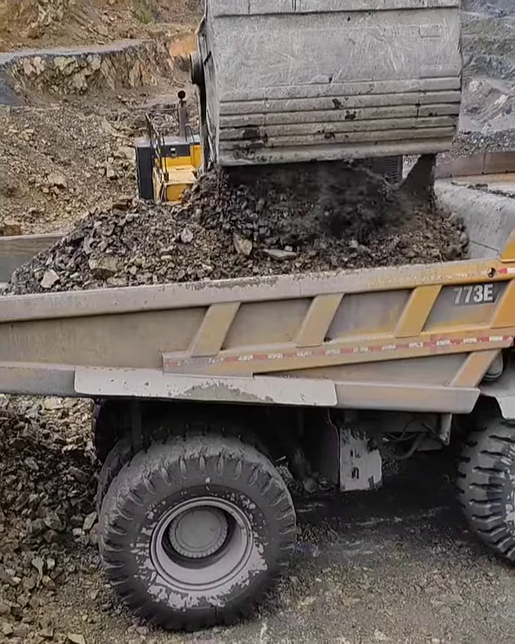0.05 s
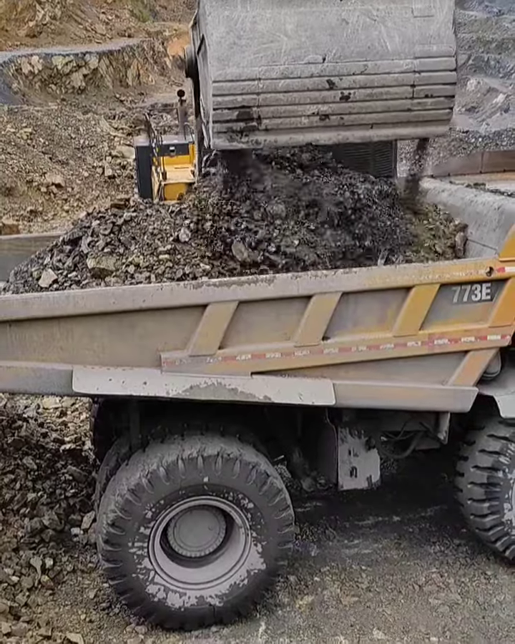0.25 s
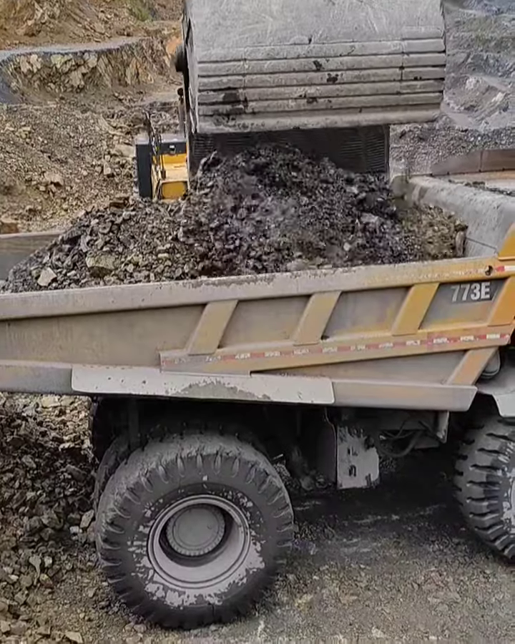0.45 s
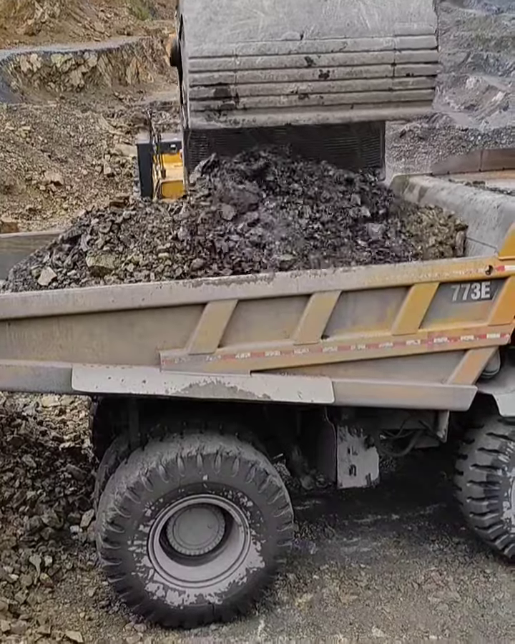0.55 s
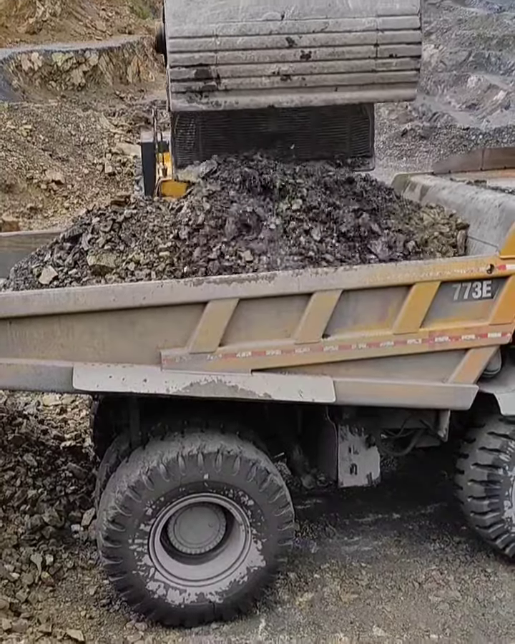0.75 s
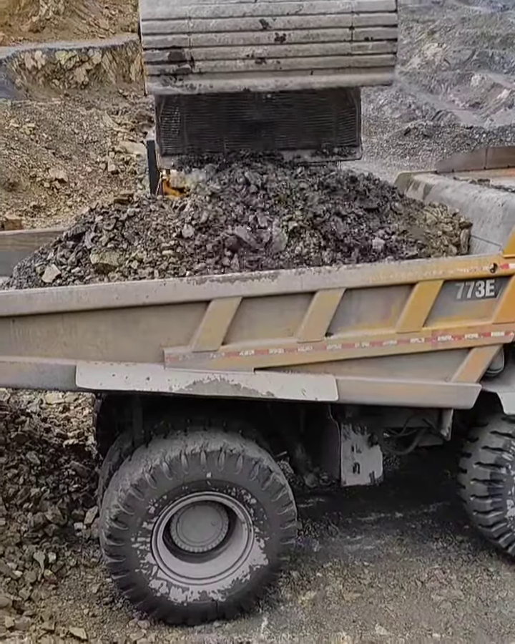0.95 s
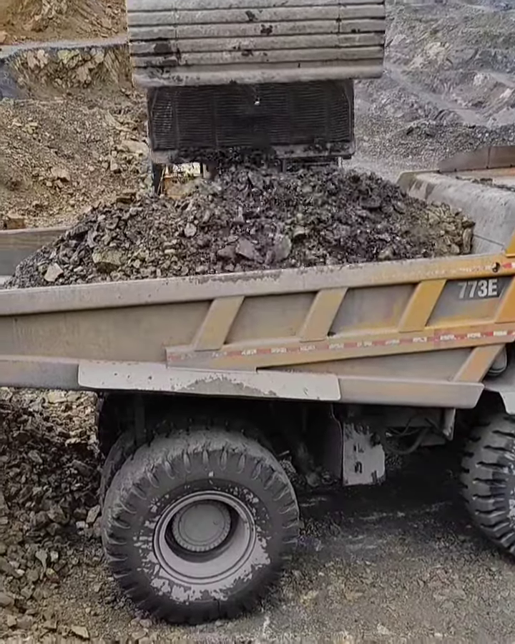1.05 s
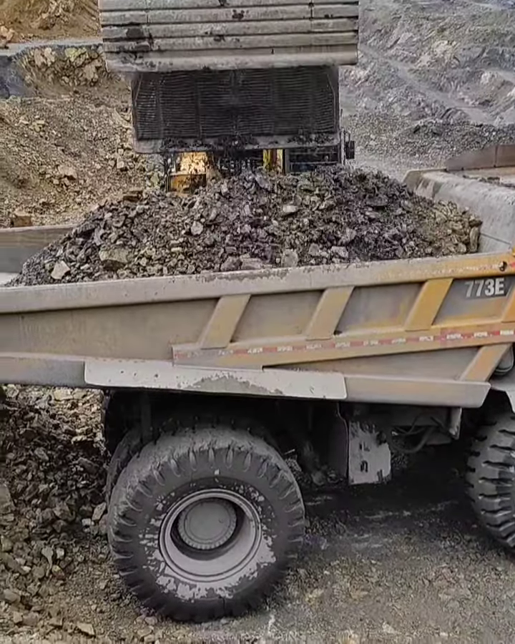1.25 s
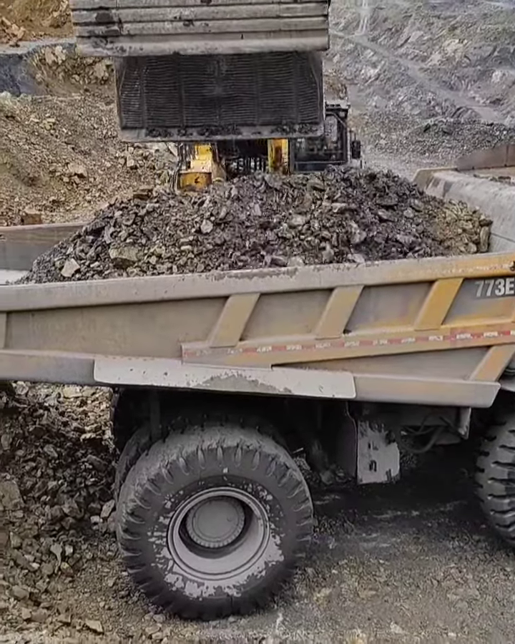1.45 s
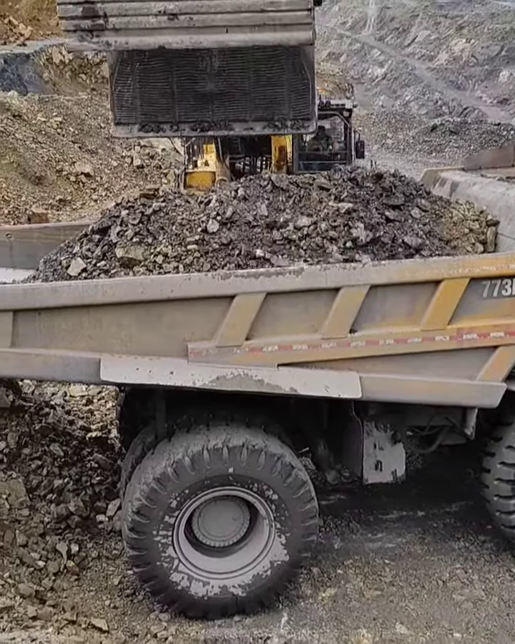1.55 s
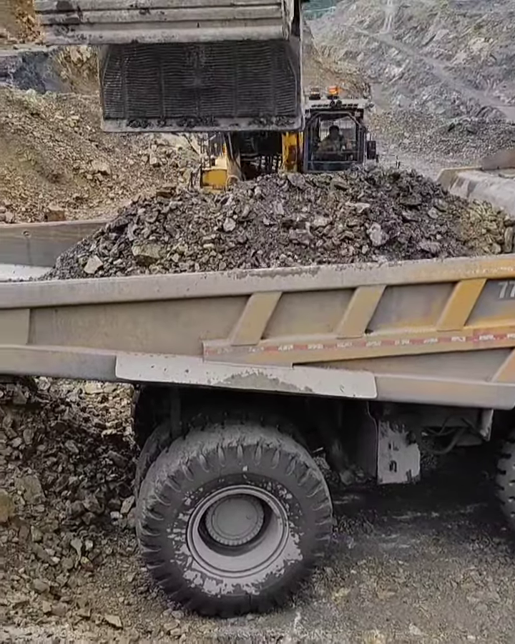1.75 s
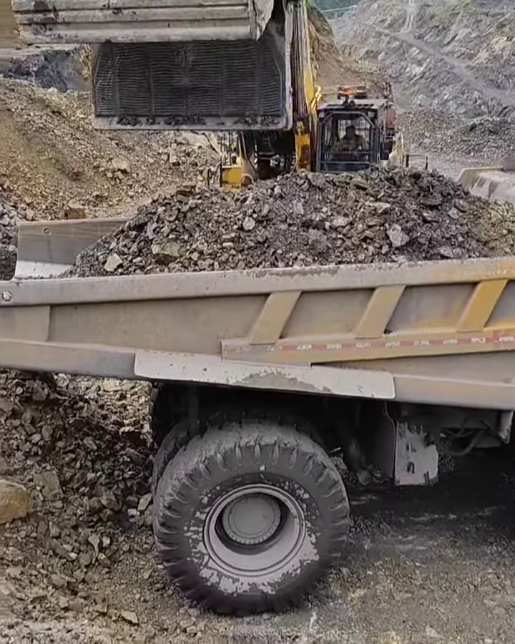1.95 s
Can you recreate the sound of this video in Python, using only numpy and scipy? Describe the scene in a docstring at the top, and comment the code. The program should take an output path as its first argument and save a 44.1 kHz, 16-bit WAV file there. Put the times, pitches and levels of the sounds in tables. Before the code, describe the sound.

Rock pours from an excavator bucket onto a loaded truck bed, swelling into a rumble with boulder thumps, steel clanks and gritty rattling, then thinning to scattered knocks. Two diesel engines drone throughout, heard close in an open quarry.

```python
"""Two diesel engines drone in a quarry; over them swells the rumble of rock poured from an excavator
bucket onto a loaded truck bed. Countless small impacts merge into rumble, steel scrape, rattle and hiss.
Single boulders thump the bed and stones ring the bucket as damped modes; one stone splits with a snap.
The engines' periodic firing gives low tones over a roar. Two close microphone ports hear the open pit."""
import sys
import numpy as np
from scipy import signal
from scipy.fft import rfft, irfft
from scipy.io import wavfile

SR = 44100
rng = np.random.default_rng(int(sys.argv[2]) if len(sys.argv) > 2 else 0)


def file_out(sig):
    """Save sig as 16-bit WAV at sys.argv[1]."""
    # one column per channel
    cols = np.atleast_2d(sig).T
    # limit, then scale
    lim = np.clip(cols, -1, 1)
    pcm = np.round(lim * 32767).astype(np.int16)
    wavfile.write(sys.argv[1], SR, pcm)


N = 88200

# Course of the slide: t/s, then level/dB of deep rumble, rumble, steel scrape, rattle, grit, dust
SLIDE_LEVELS = [(0, -44, -43, -43, -37.5, -43.5, -54), (.2, -46, -36.5, -35.5, -35.5, -43, -49.5),
                (.34, -36, -37.5, -33.5, -36, -43, -53), (.42, -38, -24, -27.5, -34.5, -41.5, -53),
                (.5, -51, -23, -28.5, -37, -48.5, -54), (.585, -45, -21, -29, -33, -39.5, -60),
                (.635, -30, -27.5, -32, -32.5, -41.5, -48), (.68, -35, -26, -23.5, -28.5, -38.5, -47),
                (.73, -30, -43, -25, -21.5, -39.5, -47), (.795, -32, -23, -22, -23, -35, -46),
                (.865, -35, -22.5, -20, -25, -39, -48), (.905, -31, -25, -38, -25, -32.5, -49),
                (.95, -34, -25, -21, -28.5, -40, -49), (1.06, -40, -24, -28, -29.5, -39.5, -53),
                (1.09, -55, -42.5, -29, -33, -44.5, -56), (1.22, -49, -24.5, -37.5, -39, -47.5, -59),
                (1.34, -47, -33.5, -31.5, -38, -45.5, -56), (1.45, -51, -35, -40.5, -38, -44, -61),
                (1.65, -41, -36, -39.5, -40.5, -46, -63), (2, -39, -37.5, -44, -43.5, -52.5, -77)]
# Spectra of falling rock, coarse to fine: f/Hz, relative level/dB
DEEP_SPECTRUM = [(28, 14), (42, 15.5), (60, 13.5), (85, -8)]
RUMBLE_SPECTRUM = [(90, -2), (120, 1.5), (180, 0), (300, -2), (350, -20)]
RATTLE_SPECTRUM = [(800, -0.5), (1000, -1.5), (1500, -4.5), (2300, -6), (2800, -6.5), (3200, -22),
                   (4200, -15)]
GRIT_SPECTRUM = [(3000, 0.5), (3900, 0), (5400, -0.5), (7500, -5.5), (8800, -13), (9400, -15.5),
                 (9900, -49)]
DUST_SPECTRUM = [(10300, -14), (11300, -3), (12500, 0), (14000, -1), (15000, -3), (15500, -10),
                 (15700, -16)]
# Normal modes of the bucket steel: f/Hz, relative level/dB, t60/s
BUCKET_MODES = [(476.7, -4.5, 0.22), (507.4, -3.5, 0.26), (559.5, 2, 0.098), (594.5, -1.5, 0.14),
                (636, 2, 0.11), (668.4, -3.5, 0.15), (698, -2.5, 0.071), (843, -13, 0.13),
                (953, -12.5, 0.23), (1043, -10.5, 0.28), (1144, -4, 0.11), (1370, -13, 0.099),
                (1668, -13.5, 0.36), (2320, -14, 0.12)]
# Boulders on the bed and stones on the bucket: t/s, level/dB, f/Hz, t60/s
BED_THUMPS = [(.4, -23, 246, 0.21), (.476, -11.5, 54.3, 0.13), (0.495, -14.5, 103.5, 0.44),
              (0.527, -16, 151.8, 0.38), (0.537, -13, 55, 0.33), (.528, -12.5, 294.3, 0.17),
              (0.539, -6.5, 296.5, 0.09), (.552, -18, 227, 0.12), (0.563, -19, 128, 0.19),
              (0.708, -15.5, 175.5, 0.21), (0.803, -5.5, 123, 0.21), (0.806, -11.5, 193, 0.21),
              (0.898, -18, 154, 0.16), (0.98, -6, 249, 0.036), (0.999, -20.5, 193, 0.21),
              (1.13, -35, 174, 0.24), (1.233, -19.5, 173, 0.21), (1.707, -11, 91, 0.058)]
BUCKET_RINGS = [(.218, -30, 578, 0.15), (.263, -32, 580, 0.061), (0.5342, -19.5, 470, 0.14),
                (.53, -16.5, 768, 0.052), (.539, -11, 592, 0.1), (.535, -10.5, 2003, 0.028),
                (.644, -20.5, 665, 0.37), (.69, -26, 668.4, 1), (.74, -14, 557, 0.076),
                (.748, -15, 643.6, 0.43), (.761, -18, 995, .05), (.775, -20, 1385, 0.17),
                (0.808, -25, 1220, 0.17), (.812, -8.5, 554.6, 0.16), (.838, -15, 539, 0.21),
                (.812, -19, 630, 0.092), (0.811, -13, 1087, .04), (0.817, -17.5, 1043, 0.17),
                (0.918, -22, 525, 0.24), (.921, -20, 950, 0.17), (1.035, -18.5, 997, .08),
                (1.038, -22, 523, 0.062), (1.046, -24, 1640, 0.12), (1.059, -22, 1144, 0.12),
                (1.12, -25, 690, 0.058), (1.2355, -8.5, 634, 0.082), (1.299, -22, 671.5, 0.26),
                (1.299, -20, 664, 0.28), (1.714, -26.5, 790, 0.23), (1.71, -28.5, 438, 0.15),
                (1.801, -31.5, 506, 0.19)]
# Scattering stones: t/s, rattle level/dB, grit level/dB, dust level/dB, rise/s, decay constant/s
STONE_BURSTS = [(0.496, -30.5, -40.5, -45, 0.003, 0.062), (0.533, -23, -27.5, -51, .001, 0.014),
                (0.645, -38, -61, -53, 0.0023, 0.013), (0.694, -34, -36.5, -50, 0.0036, 0.018),
                (.757, -25, -41, -47, 0.0081, 0.068), (.788, -38, -35, -38, .015, 0.015),
                (0.805, -16.5, -30.5, -52, 0.0024, 0.034), (0.871, -28, -28.5, -44, 0.017, 0.038),
                (.918, -24, -43, -52, 0.0028, 0.027), (1.032, -25.5, -42, -61, 0.011, 0.054),
                (1.129, -28.5, -42, -55, 0.0043, 0.026), (1.239, -33, -42.5, -55, 0.0058, 0.049),
                (1.297, -23.5, -47, -54, 0.00076, 0.028), (1.699, -32.5, -39, -52.5, 0.018, 0.05)]
# Spectrum of splitting rock: f/Hz, relative level/dB
CRACK_SPECTRUM = [(2000, 11), (3800, -22), (5600, -16), (7200, 7), (8600, -1), (9600, -29), (10600, -34),
                  (11500, -7), (13500, -7), (15500, -13)]
# Working diesel: t/s, firing rate f/Hz, then level/dB of orders 1, 2, 3
ENGINE_FIRING = [(0, 118.5, -40, -30.5, -70), (.3, 118.2, -29.5, -39, -42), (.6, 117, -63, -47, -71),
                 (1.2, 121.3, -61, -49.5, -50), (1.45, 121.2, -36, -38, -49.5),
                 (1.8, 121.6, -39, -29.5, -40), (2, 123.8, -27.5, -31.5, -50)]
# Orders of the idling truck: f/Hz, level/dB
IDLE_ORDERS = [(36, -46), (70, -39), (91.5, -41.5), (172.3, -40)]
# Broadband engine noise: f/Hz, relative level/dB
ROAR_SPECTRUM = [(20, -36), (40, -26), (100, -1), (250, -10.5), (350, -5.5), (400, -17.5), (470, -16),
                 (750, -6.5), (900, -14), (1200, -14.5), (2400, -23.5), (3100, -25.5), (7000, -35),
                 (10000, -44), (12500, -42), (15000, -41), (15700, -54)]
# Likeness of the two ports: f/Hz, coherence/1
PORT_COHERENCE = [(40, 0.99), (120, 1), (230, 1), (340, 1), (420, 0.58), (500, 1), (620, 0.96), (760, 0.77),
                  (920, 0.64), (1100, 0.6), (2000, 0.61), (2950, 0.37), (3500, 0.044), (15000, .08)]
# Left port over right: f/Hz, level difference/dB
PORT_BALANCE = [(60, 1), (240, -1), (340, -4), (480, 8.5), (610, 4), (780, -4.5), (1200, 5), (2500, -2.5),
                (3200, 0), (6000, -2.5), (8300, 11), (10500, 1), (13500, -2)]
# Left port ahead of right: f/Hz, phase/rad
PORT_LEAD = [(190, 0), (280, .3), (420, 1.1), (490, 0), (750, 0), (900, 1.2), (1100, .2), (1650, -.1),
             (2400, .9), (2950, 2.2), (7000, .5)]

GRAINS_PER_S = 3600
PITCH_WAVER, WAVER_DB = 0.00832, 1.5  # rms wander of engine pitch (a fraction) and level
ROAR_START_DB, ROAR_FALL_DB_PER_S, KNOCK_HZ, KNOCK_DEPTH = -32, 1.5, 40, 0.052


def rock_slide():
    """Superposition: dense random impacts merge into bands of noise and drive the bucket's modes."""
    boulders, stones = impacts(GRAINS_PER_S / 4), impacts(GRAINS_PER_S / 4)
    grains = impacts(GRAINS_PER_S)
    layers = (colour(boulders, DEEP_SPECTRUM), colour(boulders, RUMBLE_SPECTRUM),
              bucket_steel(stones), colour(stones, RATTLE_SPECTRUM),
              colour(grains, GRIT_SPECTRUM), colour(grains, DUST_SPECTRUM))
    return sum(amp(curve(SLIDE_LEVELS, column=1 + k)) * layer for k, layer in enumerate(layers))


def impacts(per_s, spread_db=3, clump_db=2, energy_decay_s=0.0055):
    """Shot noise: uneven knocks arrive at random, each a puff of noise, and their energies add."""
    size_db = spread_db * np.minimum(rng.exponential(1, N), 4) + clump_db * drift(31.1)
    hits = amp(size_db) * (rng.random(N) < per_s / SR)
    puff = np.exp(-np.arange(600) / SR / energy_decay_s)
    energy = signal.oaconvolve(hits ** 2, puff)[:N]
    return rng.standard_normal((2, N)) * np.sqrt(abs(energy))


def bucket_steel(force):
    """Modal response: each mode of the steel is a damped resonator; their sum is scaled to rms 1."""
    motion = 0
    for hz, db, t60 in BUCKET_MODES:
        radius, angle = np.exp(-np.log(1000) / t60 / SR), 2 * np.pi * hz / SR
        feedback = [1, -2 * radius * np.cos(angle), radius ** 2]
        motion += amp(db) * signal.lfilter([np.sin(angle)], feedback, force)
    return unit_rms(motion)


def bed_thumps():
    """Free vibration: boulders set the loaded bed ringing in low, quickly damped tones."""
    return sum(struck_mode(*row, rise_s=0.0038, sharp_by=0.0617) for row in BED_THUMPS)


def bucket_rings(neighbour_ratio=0.43):
    """Coupled vibration: a stone rings the plate it strikes, which stirs the bucket's other modes."""
    rings = sum(struck_mode(*row, rise_s=0.0017) for row in BUCKET_RINGS)
    jolts = rng.standard_normal((2, N)) * np.hypot(*rings)
    neighbours = bucket_steel(jolts) * np.sqrt(np.mean(rings ** 2))
    return rings + neighbour_ratio * neighbours


def struck_mode(start_s, db, hz, t60, rise_s, sharp_by=0, settle_s=0.019):
    """Damped oscillation: a tone decays exponentially, settling from the fraction sharp_by above hz."""
    t = time_since(start_s)
    phase = 2 * np.pi * hz * (t + sharp_by * settle_s * (1 - np.exp(-t / settle_s)))
    return (1 - np.exp(-t / rise_s)) * amp(db - 60 * t / t60) * quadrature(phase)


def loose_stones():
    """Incoherent addition: bursts of rattle, grit and dust flare and die, summing in power."""
    spectra = RATTLE_SPECTRUM, GRIT_SPECTRUM, DUST_SPECTRUM
    bands = np.array([colour(rng.standard_normal((2, N)), spectrum) for spectrum in spectra])
    power = np.zeros((3, N))
    for start_s, *levels_db, rise_s, fall_s in STONE_BURSTS:
        t = time_since(start_s)
        flare = np.minimum(t / rise_s, 1) * np.exp(-np.maximum(t - rise_s, 0) / fall_s)
        power += (amp(levels_db)[:, None] * flare) ** 2
    return (np.sqrt(power)[:, None] * bands).sum(0)


def rock_crack(start_s=0.5339, db=-14.5, rise_s=0.0004, fall_s=0.0016):
    """Brittle fracture: a stone splits in a pulse so brief that its spectrum is broad."""
    t = time_since(start_s)
    envelope = (1 - np.exp(-t / rise_s)) * np.exp(-t / fall_s)
    return amp(db) * envelope * colour(rng.standard_normal((2, N)), CRACK_SPECTRUM)


def diesels():
    """Periodic excitation: firing gives each engine wavering orders; knock modulates their roar."""
    t = time_since(0)
    firing_hz = curve(ENGINE_FIRING, column=1) * (1 + PITCH_WAVER * drift(12.2))
    cycles = np.cumsum(firing_hz) / SR
    tones = 0
    for order in (1, 2, 3):
        level_db = curve(ENGINE_FIRING, column=1 + order) + WAVER_DB * drift(16)
        tones += amp(level_db) * quadrature(2 * np.pi * (order * cycles + rng.random()))
    for hz, db in IDLE_ORDERS:
        level_db = db + WAVER_DB * drift(13)
        idle_hz = hz * (1 + 3 * PITCH_WAVER * drift(11.1))
        tones += amp(level_db) * quadrature(2 * np.pi * np.cumsum(idle_hz) / SR)
    knock = 1 + KNOCK_DEPTH * np.cos(2 * np.pi * KNOCK_HZ * t + drift(2.7))
    roar = colour(rng.standard_normal((2, N)) * knock * amp(0.37 * drift(23)), ROAR_SPECTRUM)
    return np.sqrt(2) * tones + amp(ROAR_START_DB - ROAR_FALL_DB_PER_S * t) * roar


def microphone_ports(pair):
    """Partial coherence: the ports share one signal, differ by the other, and part in level and phase."""
    hz = np.fft.rfftfreq(N, 1 / SR)
    coherence = at_frequency(PORT_COHERENCE, hz)
    side = np.array([[.5], [-.5]])  # left, right
    common, difference = rfft(pair)
    heard = np.sqrt((1 + coherence) / 2) * common + 2 * side * np.sqrt((1 - coherence) / 2) * difference
    lead = np.exp(1j * side * at_frequency(PORT_LEAD, hz))
    return irfft(heard * lead * amp(side * at_frequency(PORT_BALANCE, hz)), N)


def colour(x, spectrum, skirt_db=-30):
    """Linear filtering by a spectrum that drops away beyond its ends; rms 1."""
    (low_hz, low_db), (high_hz, high_db) = spectrum[0], spectrum[-1]
    skirted = [(low_hz * .8, low_db + skirt_db), *spectrum, (high_hz * 1.2, high_db + skirt_db)]
    gain = amp(at_frequency(skirted, np.fft.rfftfreq(N, 1 / SR)))
    return unit_rms(irfft(rfft(x) * gain, N))


def drift(top_hz):
    """Slow fluctuation: sines of random phase add to rms 1."""
    t, rates_hz = time_since(0), np.geomspace(.5, top_hz, 16)
    return unit_rms(sum(np.sin(2 * np.pi * (hz * t + rng.random())) / np.sqrt(hz) for hz in rates_hz))


def quadrature(phase):
    """Two sinusoids a quarter cycle apart."""
    return np.array([np.sin(phase), np.cos(phase)])


def at_frequency(table, hz):
    """Interpolation along a logarithmic frequency axis."""
    f, value = np.transpose(table)
    return np.interp(np.log(hz + 1), np.log(f + 1), value)


def curve(table, column):
    """Linear interpolation in time."""
    rows = np.array(table)
    return np.interp(time_since(0), rows[:, 0], rows[:, column])


def time_since(start_s):
    return np.maximum(np.arange(N) / SR - start_s, 0)


def amp(db):
    return 10 ** (np.asarray(db) / 20)


def unit_rms(x):
    return x / np.sqrt(np.mean(x ** 2) + 1e-20)


def scene():
    """Superposition: the pressures of engines and falling rock add at the ports."""
    pressure = diesels() + rock_slide() + bed_thumps() + bucket_rings() + loose_stones() + rock_crack()
    return microphone_ports(pressure)


def record(dry, ceiling=0.93, cutoff_hz=15730):
    """Soft saturation rounds the loudest peaks; a low-pass filter then limits the band."""
    rounded = dry / (1 + (abs(dry) / ceiling) ** 6) ** (1 / 6)
    lowpass = signal.firwin(2047, cutoff_hz, window=("kaiser", 9), fs=SR)
    return signal.oaconvolve(rounded, lowpass[None], "same")


dry = scene()
out = record(dry)
file_out(out)
```